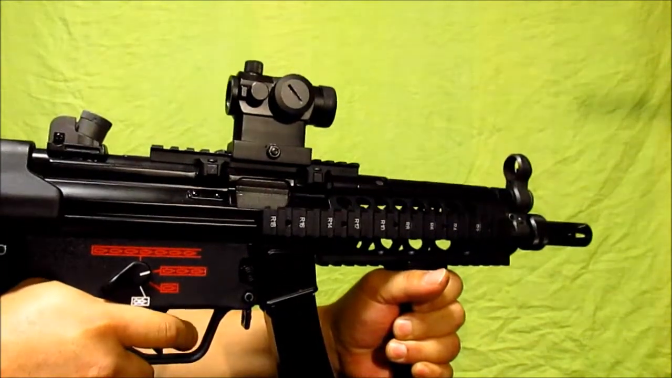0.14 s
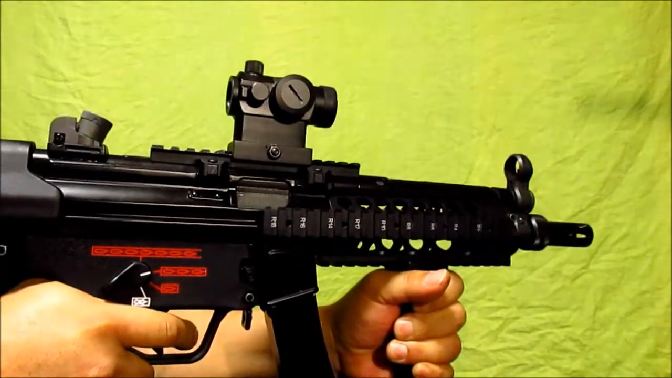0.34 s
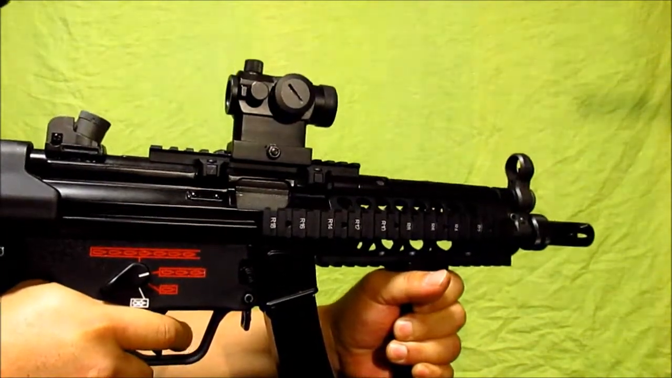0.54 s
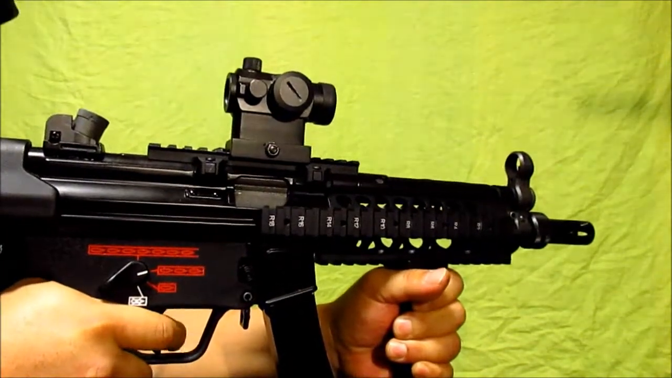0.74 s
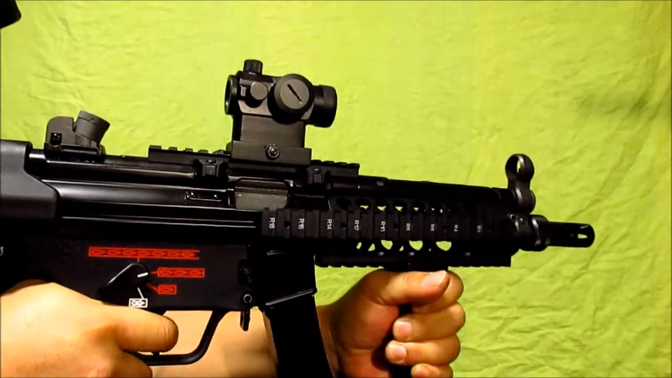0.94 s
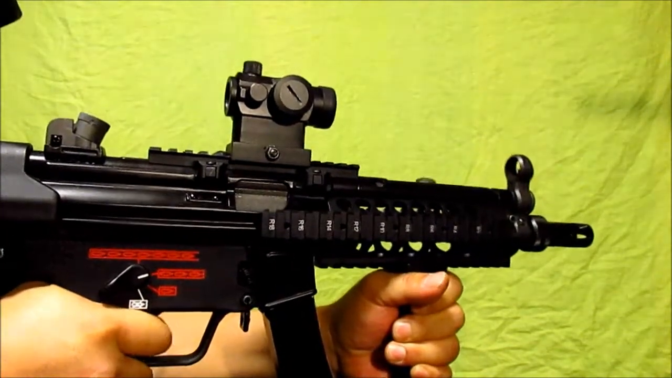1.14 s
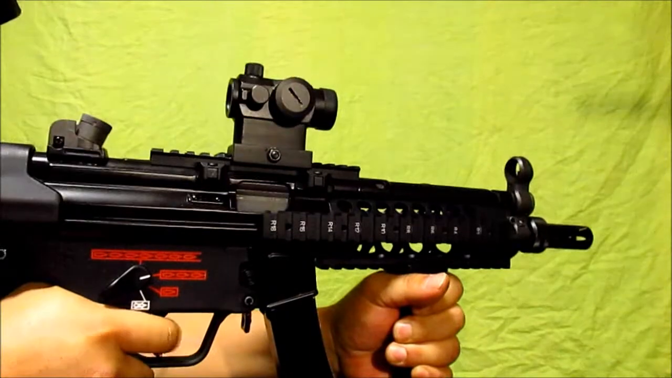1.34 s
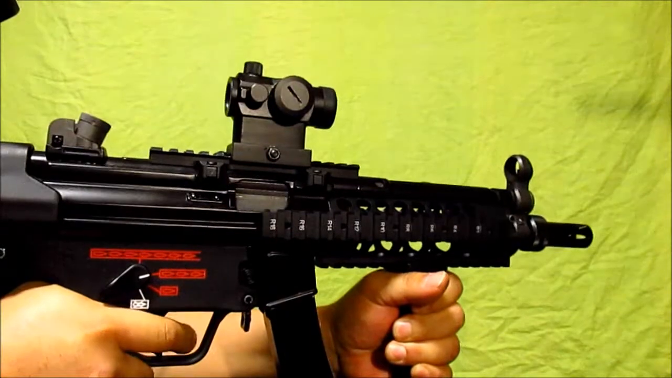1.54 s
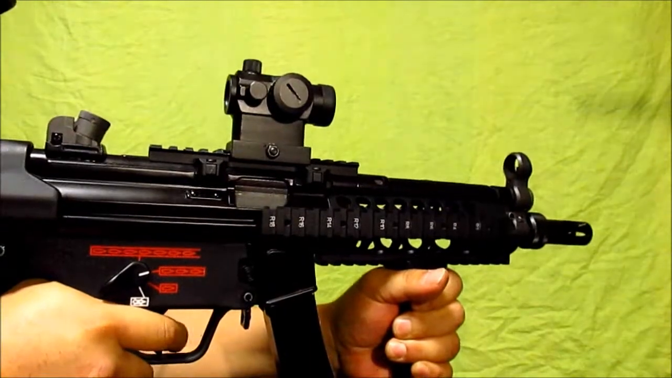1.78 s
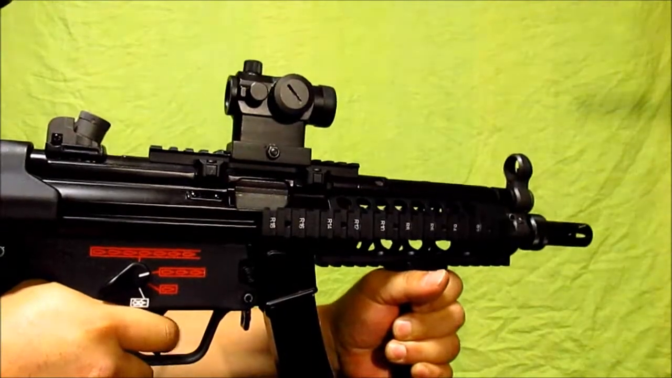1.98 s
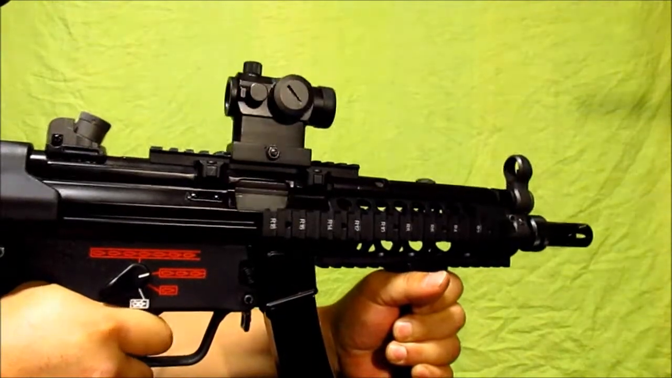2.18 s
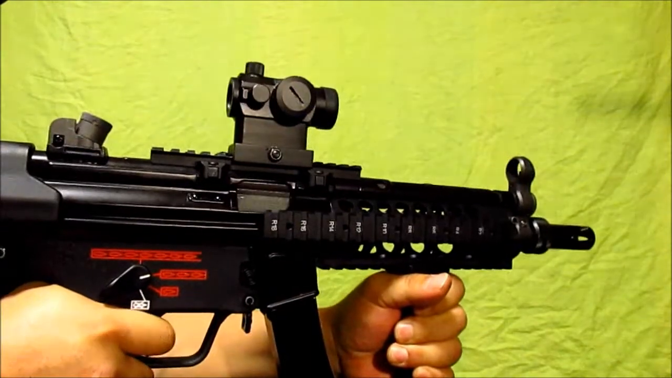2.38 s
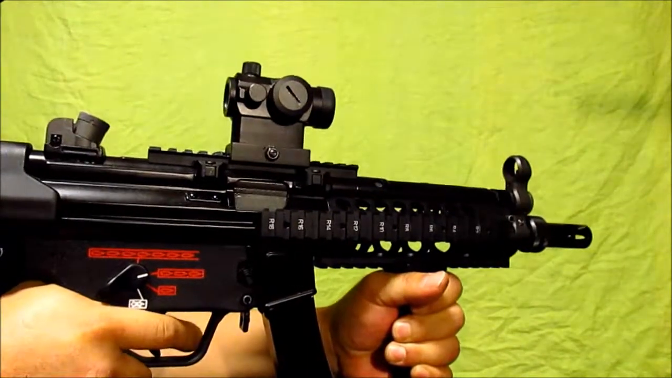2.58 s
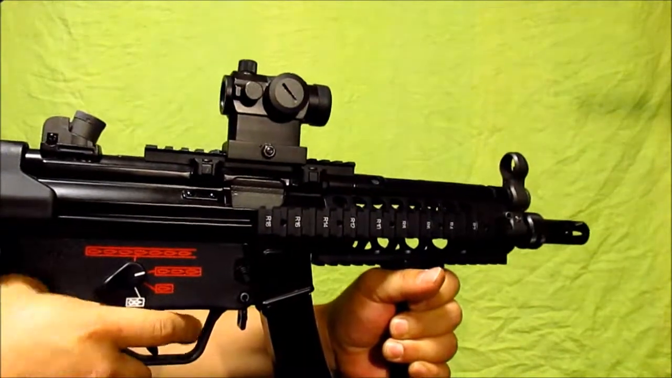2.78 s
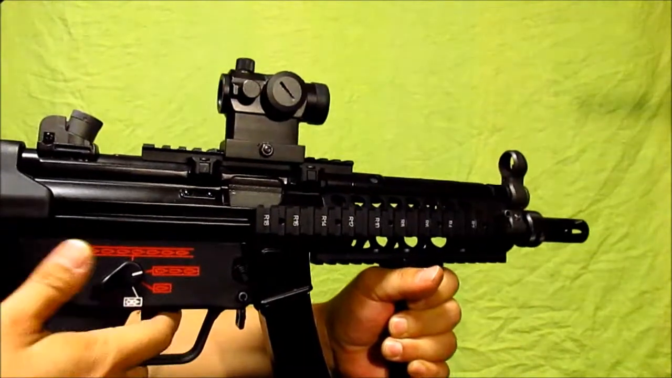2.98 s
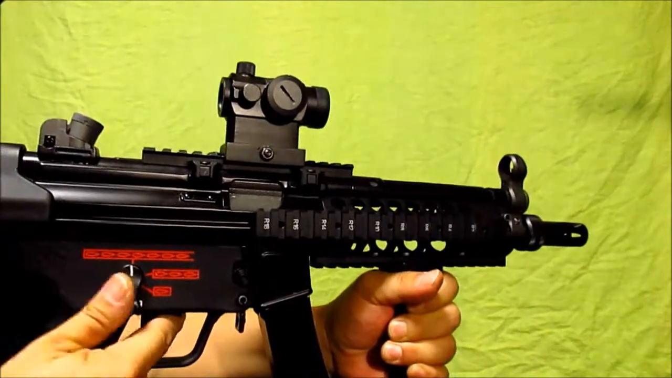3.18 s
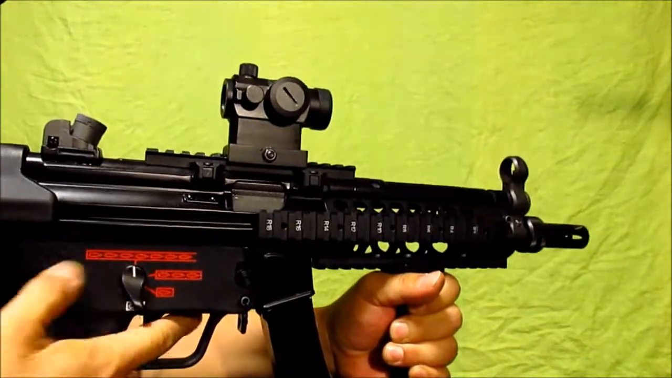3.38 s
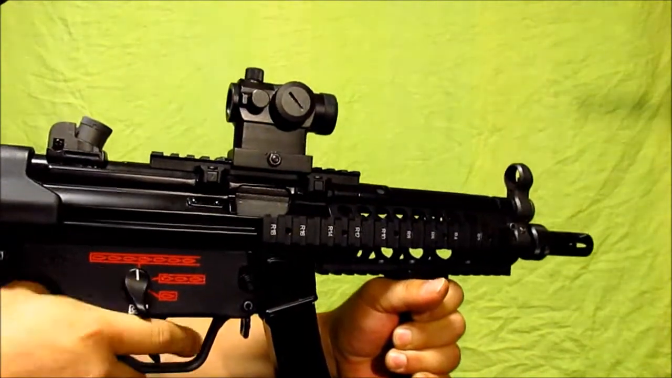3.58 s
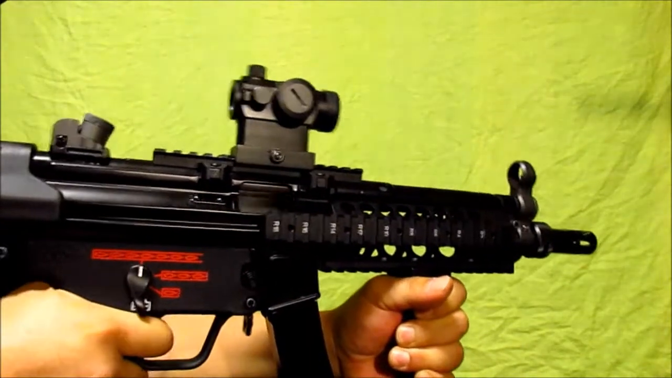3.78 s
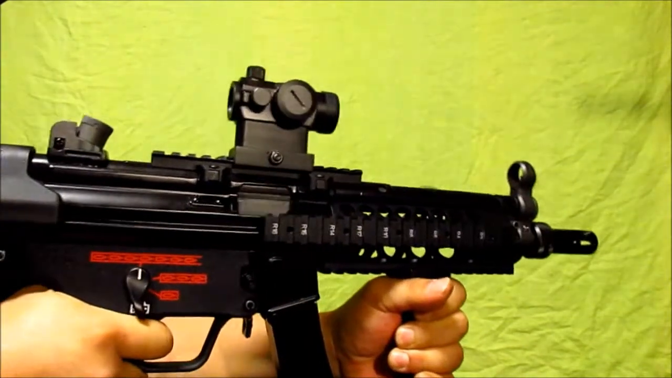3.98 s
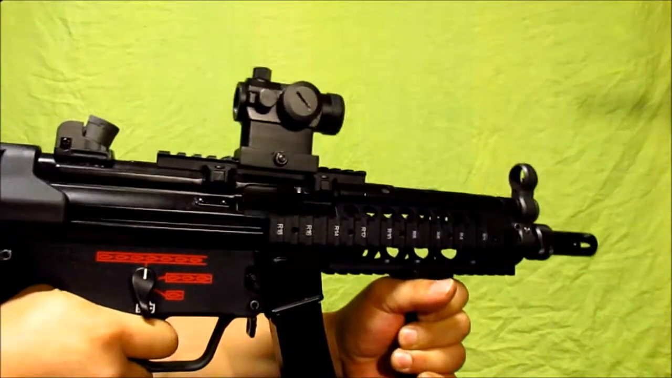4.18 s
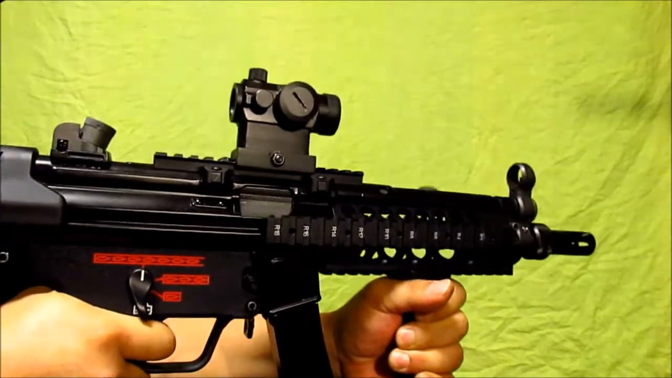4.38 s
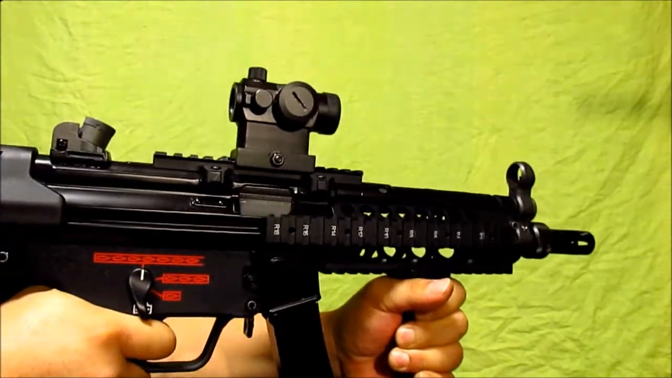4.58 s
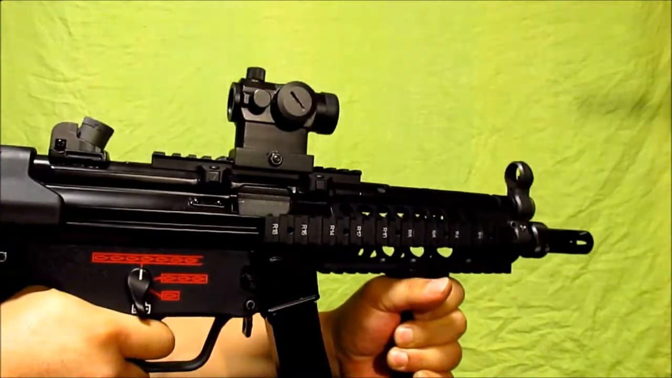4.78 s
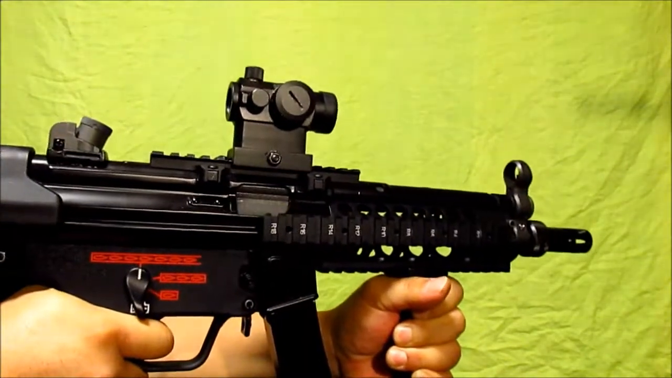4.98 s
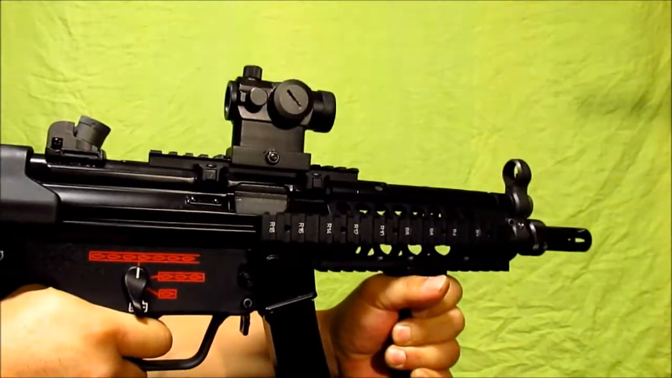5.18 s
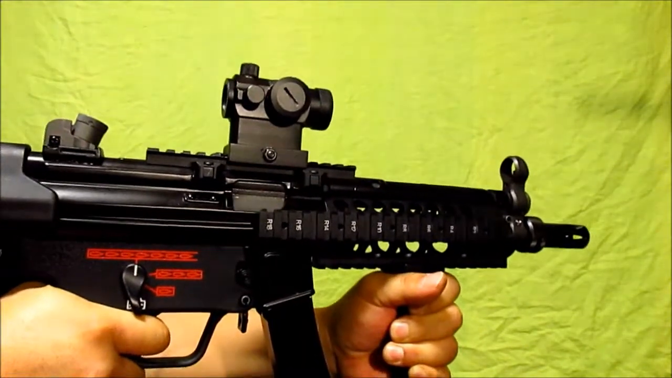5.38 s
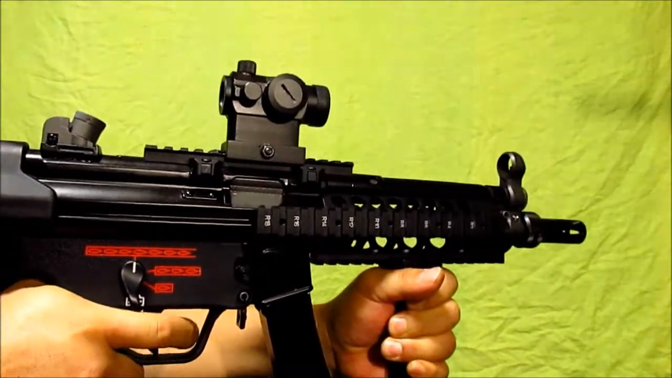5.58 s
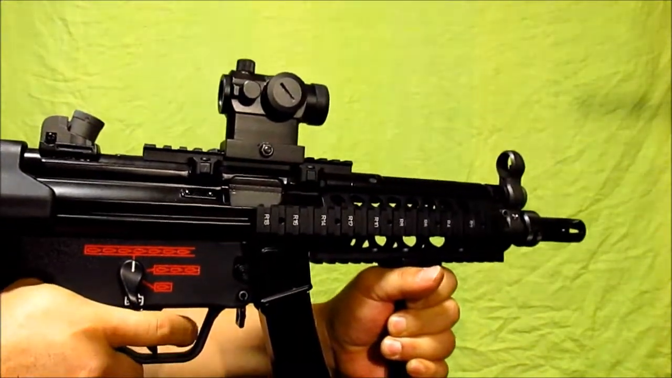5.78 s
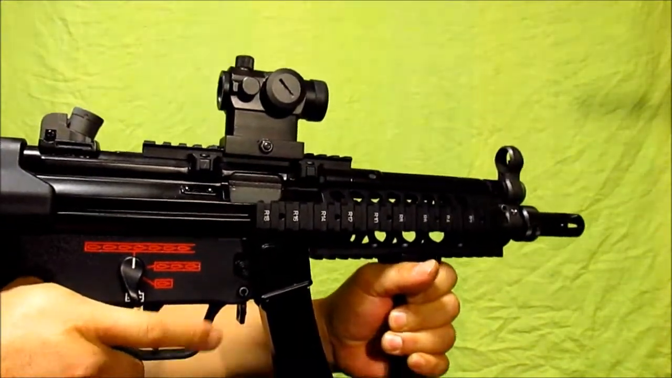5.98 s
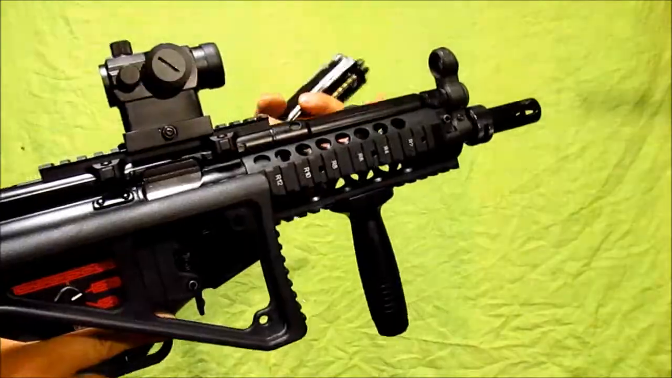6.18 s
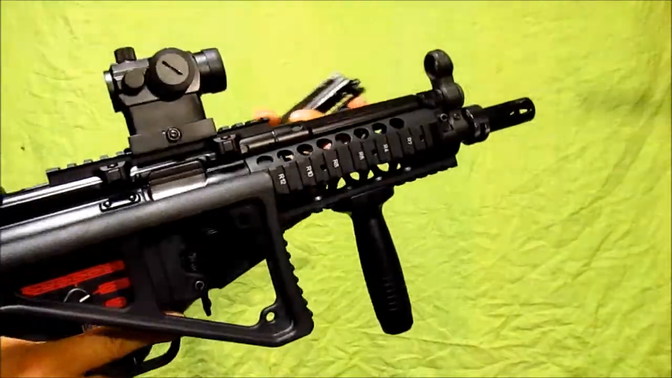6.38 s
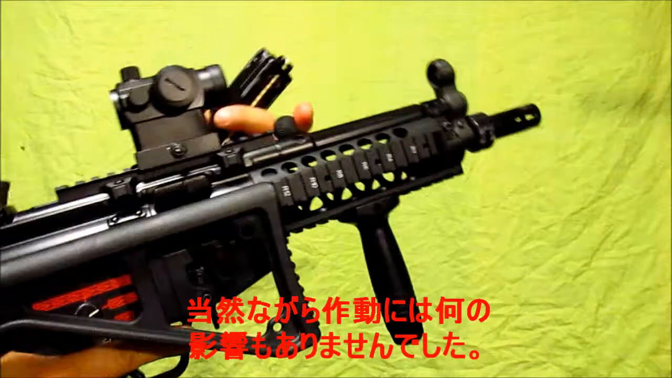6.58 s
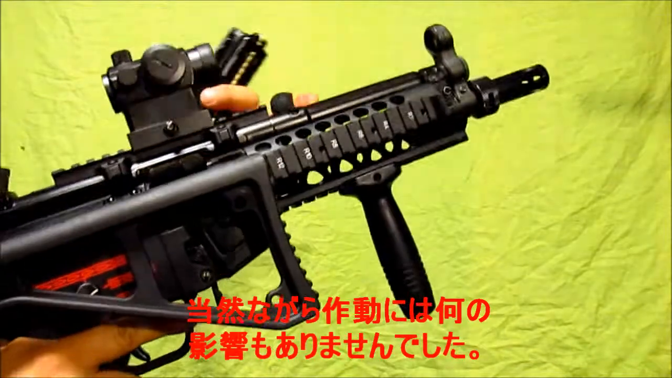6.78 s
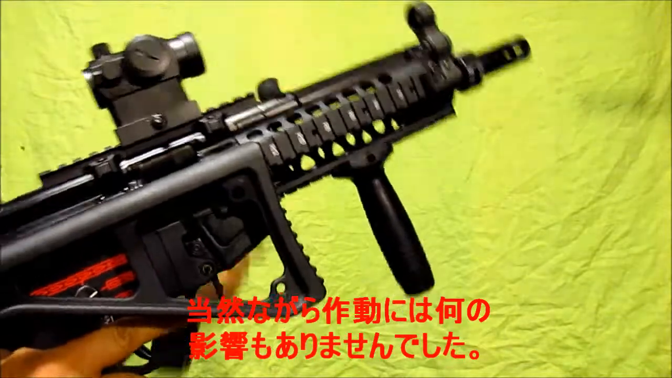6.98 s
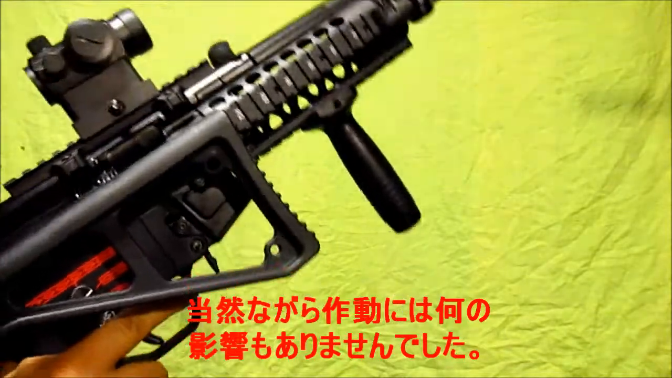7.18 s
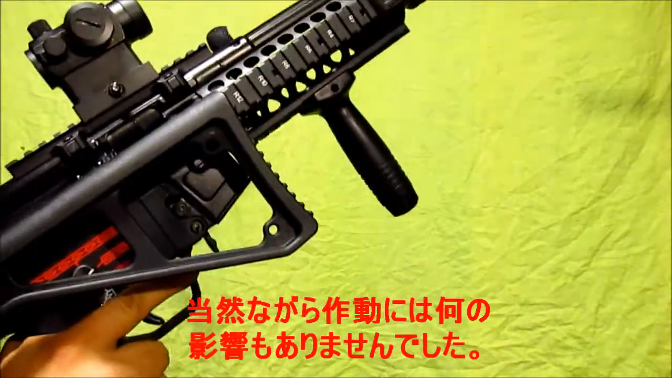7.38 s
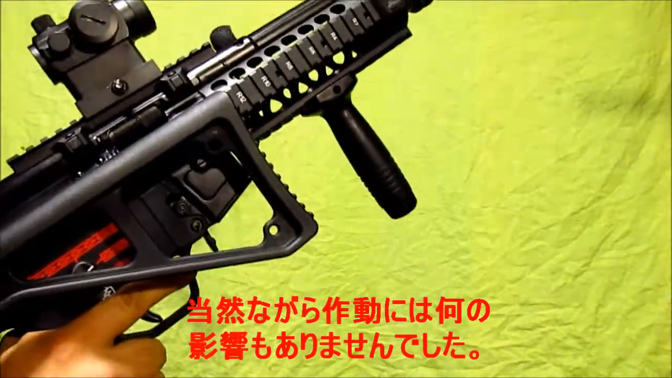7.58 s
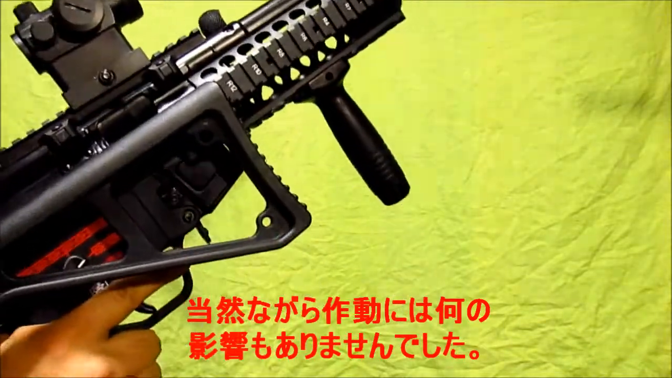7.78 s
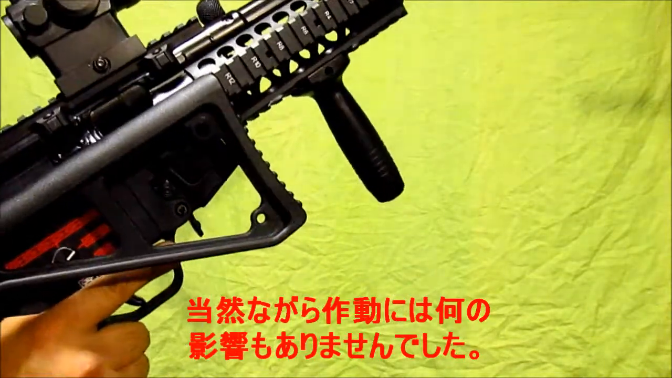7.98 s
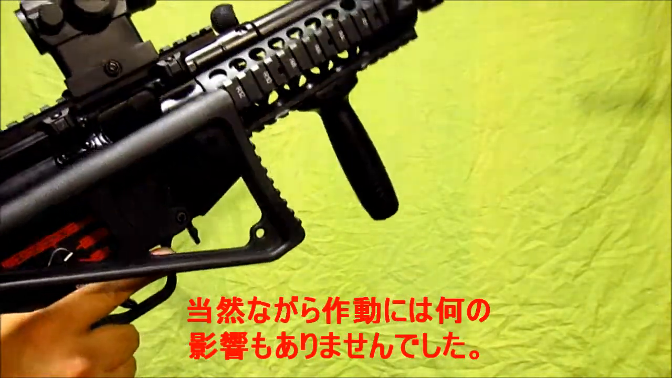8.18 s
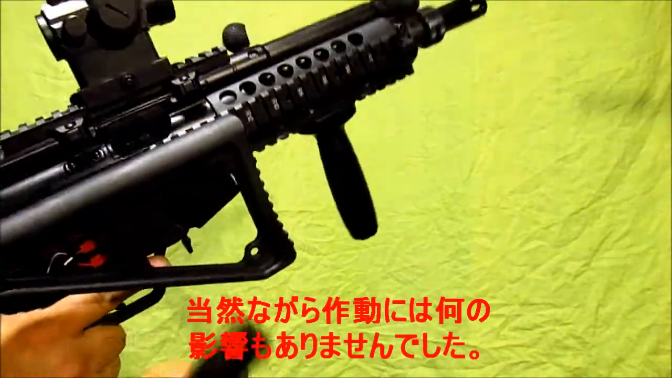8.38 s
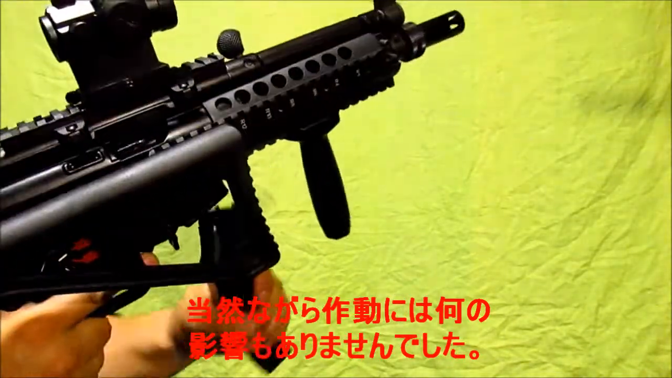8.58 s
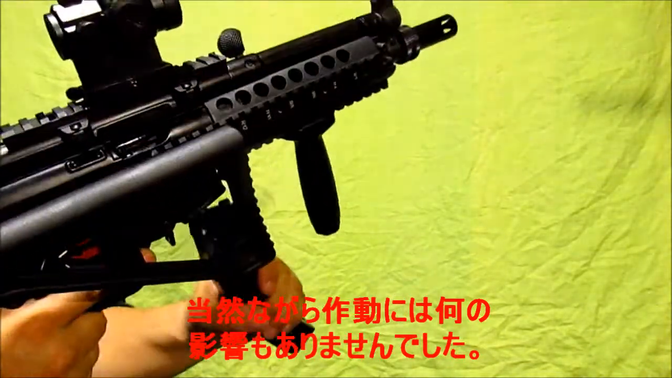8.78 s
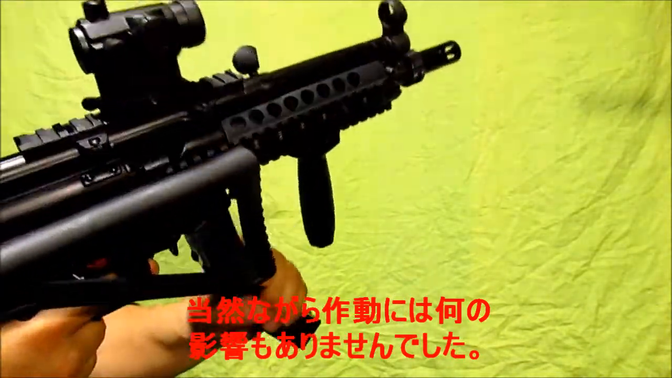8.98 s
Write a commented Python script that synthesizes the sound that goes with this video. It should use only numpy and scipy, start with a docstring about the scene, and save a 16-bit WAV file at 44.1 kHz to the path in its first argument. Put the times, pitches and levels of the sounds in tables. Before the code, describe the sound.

A gas blowback airsoft gun fires two four-round bursts and a longer nine-round burst in a small room, then the bolt is clacked home.

```python
"""Small room, close stereo pickup: a gas blowback airsoft gun fires three automatic bursts.
Per cycle: hammer, valve hiss, gas blast, bolt thrown back, pellet on target, bolt slam. These are
shaped noise bursts ringing damped body modes, plus low pressure swings; spent pellets patter down.
Selector, cocking handle and magazine are short noise contacts ringing the receiver; rubs are grainy
swells without that ring. Fan hum (shaft harmonics) and air noise sink after loud actions, then climb."""
import sys
import numpy as np
from scipy import signal
from scipy.fft import rfft, irfft, next_fast_len
from scipy.io import wavfile
from scipy.ndimage import uniform_filter1d

SR = 44100
rng = np.random.default_rng(int(sys.argv[2]) if len(sys.argv) > 2 else 0)


def wrap_up_sound(samples):
    """Save the sound to the file named by the first command line argument, as 16-bit audio."""
    columns = np.atleast_2d(samples).T
    # keep every value between -1 and 1, then stretch to whole-number steps
    tamed = np.clip(columns, -1, 1)
    steps = np.round(tamed * 32767).astype(np.int16)
    wavfile.write(sys.argv[1], SR, steps)


N = 399105

# automatic bursts: [first slam t/s, rounds, cycle/s]
BURSTS = [(1.0506, 4, .0777), (2.0438, 4, .0779), (3.7068, 9, .0783)]
# ring of receiver, magazine and spring: [f/Hz, relative level/dB, t60/s]
BODY_MODES = [(358, 8.5, 0.1), (592, -1.5, 0.5), (685, 4, 0.27), (810, 5.5, 0.033), (890, 4, 0.03),
              (964, 0.5, 0.069), (1210, 2.5, .05), (1565, -1.5, 0.23), (1886, -5, 0.1), (2480, -3, 0.072),
              (2970, -10, .045), (3020, -10.5, 0.03), (3366, -3.5, 0.021), (7360, -6, 0.13),
              (8840, -0.5, 0.054)]
# thin after-ring of the recoil spring: [f/Hz, relative level/dB, t60/s]
SPRING_MODES = [(12050, -11, .4), (13300, 6, .38), (14790, 8, .16)]
# open receiver worked by hand: [f/Hz, relative level/dB, t60/s]
RECEIVER_MODES = [(1150, 3, .08), (1270, 3.5, 0.061), (1390, 2.5, 0.12), (1790, 5, 0.05), (3130, 2, .06),
                  (3080, -2, 0.031), (5900, -5.5, .06), (7700, -6.5, .08), (10900, 0.5, .1)]

# spectra of bolt slam; hammer, valve and rear stop; gas; target: [f/Hz, relative density/dB]
SLAM_COLOUR = [(150, -43), (250, -10.5), (1020, -6), (1980, -5), (2810, 2), (5350, -4), (6360, -2),
               (7060, -3), (9660, -1.5), (10400, -2.5), (11100, -2), (14700, -8), (16000, -19)]
HAMMER_COLOUR = [(150, -45), (250, -13.5), (816, -9.5), (1400, -2), (2280, -6), (2960, -7.5), (5070, -6),
                 (5730, -5), (9010, -3), (9830, -2), (13200, -7), (16000, -17)]
GAS_COLOUR = [(130, -38), (220, -13), (530, -13.5), (745, -3), (1170, 0.5), (1470, -4), (1760, -4.5),
              (2070, -5), (3180, -0.5), (3880, -2.5), (4320, -3), (6640, -9), (9180, -6), (14400, -9),
              (16000, -24)]
TARGET_COLOUR = [(150, -16.5), (500, -9.5), (900, -3), (1300, -9.5), (2200, -13.5), (8000, -18),
                 (16000, -25.5)]
# spectra of landing pellet, hand contact, bolt in its channel, rub: [f/Hz, relative density/dB]
PELLET_COLOUR = [(150, -8), (400, -2), (1000, 0), (2600, -13), (5500, -25), (9000, -47), (16000, -42)]
CLICK_COLOUR = [(100, -16.5), (300, -10.5), (500, -3), (800, -5.5), (1300, 5), (2000, -2.5), (3200, 0.5),
                (4500, -9), (5600, -3.5), (8000, -1), (11000, -2), (16000, -19.5)]
SLIDE_COLOUR = [(250, -33), (500, -17.5), (750, -20), (1050, -5.5), (1260, 10), (1500, -3), (1900, -2),
                (2600, -13.5), (8000, -26.5)]
RUB_COLOUR = [(100, -6), (400, 3.5), (900, 2.5), (3000, -2.5), (8000, -5), (16000, -13.5)]
# spectra of room tail and moving air: [f/Hz, relative density/dB]
ROOM_COLOUR = [(60, -12.5), (250, -5), (600, -4.5), (1200, -4.5), (3000, -1.5), (8000, -1), (16000, 9.5)]
AIR_COLOUR = [(15, -29), (25, -3), (53, -7.5), (74, -11.5), (108, -7), (145, -14), (180, -13.5), (416, -19),
              (840, -20.5), (2760, -33.5), (5430, -36), (6210, -39), (8360, -37.5), (12200, -40.5),
              (14500, -49), (16000, -60.5)]

# stereo difference of blows, hand sounds, room tail, air: [f/Hz, side minus mid/dB]
BLOW_WIDTH = [(100, -2.5), (700, -12), (1500, -9), (4000, -2), (14000, -2.5)]
HAND_WIDTH = [(500, -12.5), (2000, -7.5), (10000, -3)]
ROOM_WIDTH = [(200, .5), (900, -8), (2500, 1.5), (10000, 2.5)]
AIR_WIDTH = [(40, -7.5), (100, -6.5), (300, -11), (1000, -1), (8000, .5)]

# trigger slack, sear, hammer release: [lead before first slam/s, relative level/dB]
TRIGGER_PULL = [(0.1, -48), (.0655, -17), (.054, -9)]
# selector and loose fittings: [t/s, relative level/dB, treble/dB]
SMALL_CLICKS = [(1.5975, -39.5, -21), (3.098, -38, -1), (3.322, -50, 9), (5.4034, -32, -27),
                (5.4508, -47.5, 3), (5.9632, -45.5, 1), (6.845, -41, -22), (7.001, -47.5, 5.5)]
# handle knocked free, bolt home, handle settling: [t/s, relative level/dB, knock/dB, treble/dB]
COCKING = [(6.2666, 1, -8, -4.5), (6.354, -13.5, -5, -8.5), (6.389, -18, -4.5, 22.5),
           (6.3932, -1.5, -6, -4.5), (6.409, -9.5, 7.5, -11), (6.4327, -8.5, 1, 4.5),
           (6.4372, -12, 7.5, -3.5), (6.446, 1.5, -3, -13), (6.449, -10.5, 7.5, 9.5),
           (6.463, -25.5, -2, -1.5), (6.484, -33, -21, 15), (6.543, -18.5, -1, -5)]
# magazine gripped, knocking in its well: [t/s, relative level/dB, knock/dB, treble/dB]
MAGAZINE = [(8.8591, -7, 4.5, -11.5), (8.871, -8.5, -10, -11), (8.949, -9.5, -10, -31),
            (8.9546, -19.5, -3, 1.5), (8.9764, -18, 4, -3), (8.99, -18.5, 6.5, 3), (9.006, -13.5, -1, -6.5)]
# scrapes on the gun; the first row is an earlier sound dying away:
# [t/s, length/s, relative level/dB, treble/dB]
RUBS = [(0.0, 0.059, -52, -4), (3.05, 0.057, -67, 2), (3.322, 0.059, -59, 8), (3.502, .06, -69.5, 4.5),
        (5.393, .05, -57.5, -3), (6.042, .08, -63, 6), (6.376, 0.044, -35, -5), (8.683, 0.52, -54.5, 10)]

# room decay: [f/Hz, t60/s]
ROOM_T60 = [(200, 0.14), (1000, .23), (3000, 0.21), (8000, 0.18), (15000, 0.036)]
# fan hum: [multiple of shaft rate, relative rms level/dB]
HUM = [(1, -56.5), (2, -45), (3, -65.5), (5, -56.5), (6, -62), (8, -54.5), (9, -58), (11, -63.5),
       (13, -60.5), (16, -72.5), (21, -64)]
# broad humps in the air noise: [f/Hz, width/Hz, level/dB]
AIR_HUMPS = [(1520, 330, 3), (3970, 400, 1.5), (5380, 430, 1.5), (7300, 240, 4.5), (8450, 230, 5),
             (9600, 350, 5), (12300, 700, 2.5)]
# broad tone of the air noise, then its hiss part: [f/Hz, level/dB]
AIR_TONE = [(30, -2), (70, -2.5), (110, .5), (180, .5), (300, 1), (12000, .5), (15000, 0)]
HISS_TILT = [(800, -30.5), (3000, 2)]

# leads before each slam
VALVE_LEAD_S, GAS_LEAD_S, RECOIL_LEAD_S = .048, .039, .0352
STOP_LEAD_S, TARGET_LEAD_S = .028, .0175
# hammer: before a burst's first slam, then after each slam; last fall finds no gas
HAMMER_LEAD_S, HAMMER_DELAY_S, DRY_FIRE_S = .0495, .0255, 4.358
# fuller gas on a burst's first round; growth per round; chance spread
FRESH_GAS_DB, BUILD_DB, SCATTER_DB = 3.5, .19, .55
# spread of thump phase between channels
THUMP_SKEW_RAD = .73
# wait after a burst; spread added per round
PELLET_FALL_S, PELLET_SPREAD_S = .2, .015
# from here the background is louder and brighter; bolt runs home
BRIGHTER_FROM_S, BOLT_HOME_S = 6.125, 6.446
# background gain after a loud action, wait, then linear climb of gain
DUCK_DB, DUCK_HOLD_S = -17.5, .18
EARLY_CLIMB_PER_S, LATE_CLIMB_PER_S = .11, .67
EARLY_HISS_DB, LATE_HISS_DB = -4, 1.16
SHAFT_HZ, TOP_HZ = 22.2, 15900


def slams():
    """Slam times of each burst: the bolt cycles at a steady period."""
    return [first + cycle_s * np.arange(rounds) for first, rounds, cycle_s in BURSTS]


def action(hammer_db=-15.5, first_hammer_db=-17, valve_db=-19.5, gas_db=-16.5, stop_db=-19.5, slam_db=-10):
    """Firing cycle: hammer opens valve, gas drives bolt to the rear stop, bolt slams home."""
    shut = np.concatenate(slams())
    number = np.concatenate([np.arange(len(burst)) for burst in slams()])
    first = number == 0

    after_slam = np.roll(shut, 1) + HAMMER_DELAY_S
    fall = np.append(np.where(first, shut - HAMMER_LEAD_S, after_slam), DRY_FIRE_S)
    fall_db = np.append(np.where(first, first_hammer_db, hammer_db), hammer_db)

    scatter_db = SCATTER_DB * rng.standard_normal((2, len(shut)))
    shut_db, pressure_db = BUILD_DB * number + scatter_db
    pressure_db = pressure_db + FRESH_GAS_DB * first

    hammer = blows(fall, fall_db, HAMMER_COLOUR,
                   rise_s=.0006, hold_s=.003, t60_s=.03, alike=.3, grain_db=1.5)
    valve = blows(shut - VALVE_LEAD_S, pressure_db + valve_db, HAMMER_COLOUR,
                  rise_s=.002, hold_s=.012, t60_s=.03, alike=.2, grain_db=2)
    gas = blows(shut - GAS_LEAD_S, pressure_db + gas_db, GAS_COLOUR,
                rise_s=.004, hold_s=.014, t60_s=.032, alike=.15, grain_db=1.5)
    stop = blows(shut - STOP_LEAD_S, pressure_db + stop_db, HAMMER_COLOUR,
                 rise_s=.0005, hold_s=.003, t60_s=.025, alike=.3, grain_db=2)
    slam = blows(shut, shut_db + slam_db, SLAM_COLOUR,
                 rise_s=.0004, hold_s=.0028, t60_s=.022, alike=.45, grain_db=1)
    return hammer + valve + gas + stop + slam


def blows(times, dbs, colour, rise_s, hold_s, t60_s, alike, grain_db):
    """Repeated strikes of one part: noisy chatter in contact, then exponential decay."""
    t, track = clock(.08), np.zeros((2, N))
    envelope = np.minimum(t / rise_s, 1) * fade(np.maximum(t - hold_s, 0), t60_s)
    own = stereo_noise(len(t), BLOW_WIDTH)  # common to all strikes; alike = its power share
    for s, db in zip(times, dbs):
        grain = grains(t, grain_db, knots=100)
        grain /= np.sqrt(np.mean(grain ** 2))
        chatter = np.sqrt(alike) * own + np.sqrt(1 - alike) * stereo_noise(len(t), BLOW_WIDTH)
        add(track, s, undb(db) * envelope * chatter * grain)
    return through(track, response(colour))


def recoil(thump_db=-5, boom_db=-30, boom_hz=372, boom_t60_s=.28):
    """Bolt momentum jerks the gun: low thumps; a burst's first shot booms in the hollow body."""
    shut = np.concatenate(slams())
    kick = thumps(shut - RECOIL_LEAD_S, db=-20, hz=190, width_s=.0028)
    sway = thumps(shut - .043, db=-34, hz=140, width_s=.005)
    landing = thumps(shut + .003, db=-25, hz=115, width_s=.003)
    t, boom = clock(.25), np.zeros((2, N))
    ring = undb(boom_db) * np.sin(2 * np.pi * boom_hz * t) * fade(t, boom_t60_s)
    for burst in slams():
        add(boom, burst[0] - GAS_LEAD_S, ring[None])
    return undb(thump_db) * (kick + sway + landing) + boom


def thumps(times, db, hz, width_s):
    """Gun jerk: one pressure swing, down then up, phase-skewed between channels."""
    t, track = clock(.04) - .02, np.zeros((2, N))
    window = np.exp(-(t / width_s) ** 2)
    for s in times:
        chance, skew = rng.standard_normal(2)
        phase = THUMP_SKEW_RAD * skew * np.array([[1], [-1]])
        swing = np.sin(2 * np.pi * hz * t + phase) * window
        add(track, s + t[0], undb(db + 2 * chance) * swing)
    return track


def target(pop_db=-21):
    """Pellet impact: a short noise pop on the target."""
    hits = np.concatenate(slams()) - TARGET_LEAD_S
    return blows(hits, np.full(len(hits), pop_db), TARGET_COLOUR,
                 rise_s=.0005, hold_s=.002, t60_s=.022, alike=.5, grain_db=2)


def body(x, modes, ring_db):
    """Blows excite damped modes, each with its own phase per channel."""
    t = clock(.6)
    ring = np.zeros((2, len(t)))
    for hz, db, t60_s in modes:
        decay_per_s = np.log(1000) / t60_s
        phase = .5 * rng.standard_normal((2, 1))
        level = undb(db + ring_db) * 2 * decay_per_s / SR
        ring += level * np.exp(-decay_per_s * t) * np.cos(2 * np.pi * hz * t + phase)
    return x + through(x, ring)


def spent_pellets(tick_db=-57, early_db=-1, scatter_db=3):
    """Pellet bounces: faint ticks, three per round after each burst, and a few near the start."""
    times = []
    for burst in slams():
        bounces = 3 * len(burst)
        order = np.arange(bounces) + rng.uniform(size=bounces)
        times.append(burst[-1] + PELLET_FALL_S + PELLET_SPREAD_S * order / 3)
    times = np.concatenate(times)
    early = rng.uniform(.14, .36, size=9)
    dbs = tick_db + np.append(np.zeros(len(times)), np.full(len(early), early_db))
    dbs = dbs + scatter_db * rng.standard_normal(len(dbs))
    return blows(np.append(times, early), dbs, PELLET_COLOUR,
                 rise_s=.0012, hold_s=.00085, t60_s=.025, alike=.25, grain_db=1.5)


def handling(click_db=-10):
    """Contacts and bolt slide ring the receiver, rubs stay dry."""
    clicks = through(undb(click_db) * (trigger() + worked_parts()), response(CLICK_COLOUR))
    return body(clicks + bolt_slide(), RECEIVER_MODES, ring_db=-8.5) + rubbing()


def trigger(knock_db=-10, treble_db=0):
    """Trigger linkage: the same three clicks lead into every burst."""
    rows = [(burst[0] - lead_s, db, knock_db, treble_db)
            for burst in slams() for lead_s, db in TRIGGER_PULL]
    return contacts(rows, t60_s=.03)


def worked_parts(small_knock_db=-1):
    """Selector and fittings click, cocking handle stops short, magazine knocks more loosely."""
    rows = [(s, db, small_knock_db, treble_db) for s, db, treble_db in SMALL_CLICKS]
    small = contacts(rows, t60_s=.023)
    cocking = contacts(COCKING, t60_s=.015, hold_s=.0016)
    magazine = contacts(MAGAZINE, t60_s=.036)
    return small + cocking + magazine


def contacts(rows, t60_s, hold_s=.00038):
    """Sharp contacts: instant noise onset, brief hold, exponential decay."""
    t, track = clock(.25), np.zeros((2, N))
    envelope = fade(np.maximum(t - hold_s, 0), t60_s)
    for s, db, knock_db, treble_db in rows:
        contact = stereo_noise(len(t), HAND_WIDTH) * envelope
        add(track, s, undb(db) * tint(contact, knock_db, treble_db))
    return track


def bolt_slide(slide_db=-22):
    """Bolt let go by hand: judders forward, louder as it gathers speed."""
    dbs = slide_db + np.array([-8, -1, 0])
    return blows([6.413, 6.435, 6.445], dbs, SLIDE_COLOUR,
                 rise_s=.002, hold_s=.007, t60_s=.04, alike=0, grain_db=1.5)


def rubbing(attack_share=.11, knock_db=-6.5, grain_db=1.5):
    """Grainy noise that swells and fades, without the receiver's ring."""
    t, rubs = clock(.4), np.zeros((2, N))
    for s, length_s, db, treble_db in RUBS:
        swell = np.minimum(t / (attack_share * length_s), 1) * np.exp(-2 * (t / length_s) ** 2)
        rub = stereo_noise(len(t), HAND_WIDTH) * swell * grains(t, grain_db, knots=128)
        add(rubs, s, undb(db) * tint(rub, knock_db, treble_db))
    return through(rubs, response(RUB_COLOUR))


def tint(x, knock_db, treble_db):
    """Heavier or brighter sound around an unchanged 2.6-5.5 kHz middle."""
    tone = [(1300, knock_db), (2600, 0), (5500, 0), (9000, treble_db)]
    # undo the unit-energy scaling of response()
    return through(x, response(tone)) * np.sqrt(np.mean(gains(tone, size=1024) ** 2))


def room(x, gap_s=.0043):
    """Near walls: noise tail after a short gap, each band with its own decay."""
    t = clock(.4)
    noise = stereo_noise(len(t), ROOM_WIDTH)
    hz, t60_s = np.transpose(ROOM_T60)
    log_bins = np.log(np.arange(len(t) // 2 + 1) * SR / len(t) + 1)
    tail = np.zeros((2, len(t)))
    for share, band_t60_s in zip(np.eye(len(hz)), t60_s):
        band = irfft(rfft(noise) * np.interp(log_bins, np.log(hz), share), len(t))
        tail += band * fade(t, band_t60_s)
    tail *= t > gap_s
    return through(x, shape(tail / np.linalg.norm(tail[0]), ROOM_COLOUR))


def background(air_db=-47, hum_db=0, left_db=1.5):
    """Fan hum as drifting shaft harmonics, moving air as coloured noise with hiss on top."""
    swell_db, hiss_db = ducking()
    air = through(stereo_noise(N, AIR_WIDTH), response(AIR_COLOUR, size=8192))
    grid_hz = np.linspace(20, SR / 2, num=400)
    humps_db = sum(db * np.exp(-(2 * (grid_hz - hz) / width_hz) ** 2) for hz, width_hz, db in AIR_HUMPS)
    air = shape(air, np.column_stack([grid_hz, humps_db]))
    air = shape(air, AIR_TONE)
    hiss = shape(air, HISS_TILT)
    air = air + (undb(hiss_db) - 1) * hiss
    air = air * undb(air_db + .5 * wander(rate_hz=7))

    turn = 2 * np.pi * np.cumsum(SHAFT_HZ + .024 * wander(rate_hz=3.9)) / SR
    hum = np.zeros(N)
    for order, db in HUM:
        level = np.sqrt(2) * undb(db + .36 * wander(rate_hz=11))
        hum += level * np.cos(round(order) * turn + rng.uniform(0, 2 * np.pi))
    return (air + undb(hum_db) * hum) * undb(swell_db) * lean(left_db)


def ducking():
    """Background level and hiss/dB: low at t=0, after each burst and at bolt home, then climbing."""
    t = np.arange(N) / SR
    ducks = np.array([0] + [burst[-1] for burst in slams()] + [BOLT_HOME_S])
    since = t - ducks[np.searchsorted(ducks, t, side="right") - 1]
    early = t < BRIGHTER_FROM_S
    climb = np.where(early, EARLY_CLIMB_PER_S, LATE_CLIMB_PER_S)
    gain = undb(DUCK_DB) + climb * np.maximum(since - DUCK_HOLD_S, 0)
    gain = uniform_filter1d(gain, size=1000)
    return 20 * np.log10(gain), np.where(early, EARLY_HISS_DB, LATE_HISS_DB)


def wander(rate_hz):
    """Random drift, spread near 1, linear between knots."""
    knots = rng.standard_normal(int(N / SR * rate_hz) + 2)
    return np.interp(np.arange(N) / SR * rate_hz, np.arange(len(knots)), knots)


def undb(db):
    """Decibels to gain."""
    return 10 ** (np.asarray(db) / 20)


def lean(left_db):
    """Channel gains: left up, right down by the same dB."""
    return undb(np.array([[left_db], [-left_db]]))


def clock(seconds):
    """Sample times of a short sound."""
    return np.arange(int(seconds * SR)) / SR


def fade(t, t60_s):
    """Exponential decay: 60 dB down at t60."""
    return np.exp(-np.log(1000) * t / t60_s)


def grains(t, grain_db, knots):
    """Random level flicker, linear in dB between knots."""
    return undb(grain_db * np.interp(t, np.linspace(0, t[-1], num=knots), rng.standard_normal(knots)))


def stereo_noise(size, width):
    """Unit-power noise; width sets the side/mid ratio over frequency."""
    mid, side = rng.standard_normal((2, size))
    ratio = gains(width, size)
    spectrum = rfft(mid) + np.array([[1], [-1]]) * ratio * rfft(side)
    return irfft(spectrum / np.sqrt(1 + ratio ** 2), size)


def gains(points, size):
    """Gain per Fourier bin from (f/Hz, level/dB), interpolated over log frequency."""
    hz, db = np.transpose(points)
    bins_hz = np.arange(size // 2 + 1) * SR / size
    return undb(np.interp(np.log(bins_hz + 1), np.log(hz), db))


def shape(x, points):
    """Zero-phase colouring by (f/Hz, level/dB)."""
    size = next_fast_len(x.shape[-1])
    return irfft(rfft(x, size) * gains(points, size), size)[..., :x.shape[-1]]


def response(points, size=1024):
    """Minimum-phase impulse response of unit energy, via the folded cepstrum."""
    cepstrum = irfft(np.log(gains(points, size)))
    cepstrum[1:size // 2] *= 2
    cepstrum[size // 2 + 1:] = 0
    h = irfft(np.exp(rfft(cepstrum)))
    return h / np.linalg.norm(h)


def through(x, h):
    """Convolve both channels with an impulse response."""
    return signal.oaconvolve(x, np.atleast_2d(h), axes=1)[:, :x.shape[1]]


def add(track, s, sound):
    """Mix a sound in at time s."""
    i = max(int(s * SR), 0)
    track[:, i:i + sound.shape[1]] += sound[:, :max(N - i, 0)]


def scene(shot_wet_db=-5, hand_wet_db=-9, shot_left_db=.4, hand_left_db=1):
    """Gun slightly left; handling is nearer, so it sends less to the room."""
    ringing = body(action(), BODY_MODES + SPRING_MODES, ring_db=-5.5)
    shots = (ringing + recoil() + target()) * lean(shot_left_db)
    pellets = spent_pellets()
    hands = handling() * lean(hand_left_db)
    wet = room(undb(shot_wet_db) * (shots + pellets) + undb(hand_wet_db) * hands)
    return shots + pellets + hands + wet + background()


def record(dry, drive=.98):
    """Recorder: tanh rounds the highest peaks, a steep low-pass cuts the top."""
    rounded = np.tanh(drive * dry) / drive
    low_pass = signal.ellip(10, .2, 70, TOP_HZ, fs=SR, output="sos")
    return signal.sosfilt(low_pass, rounded)


dry = scene()
out = record(dry)
wrap_up_sound(out)
```